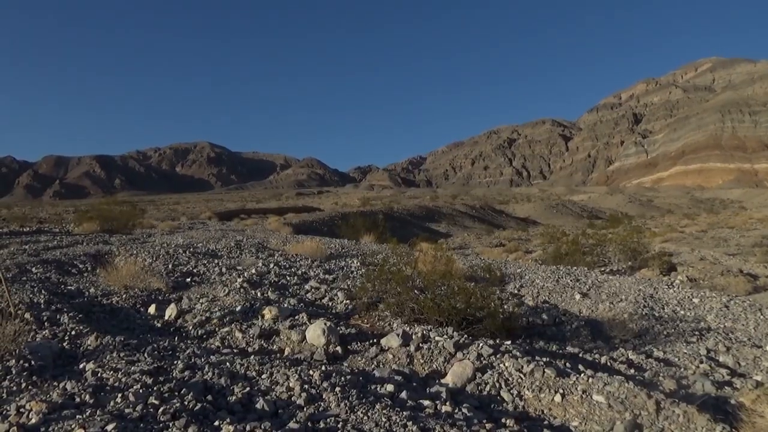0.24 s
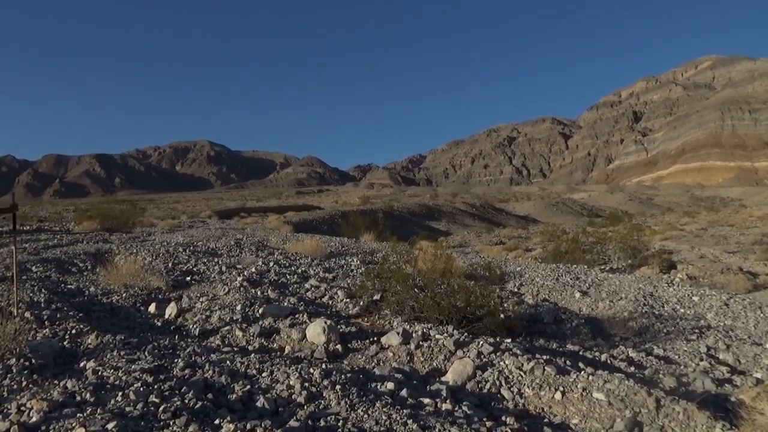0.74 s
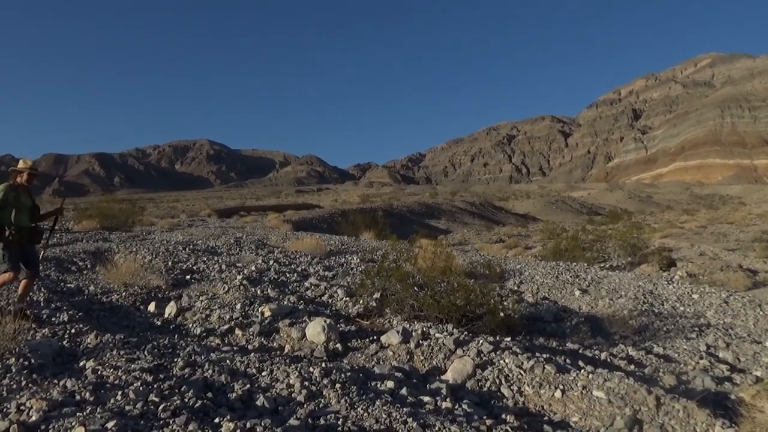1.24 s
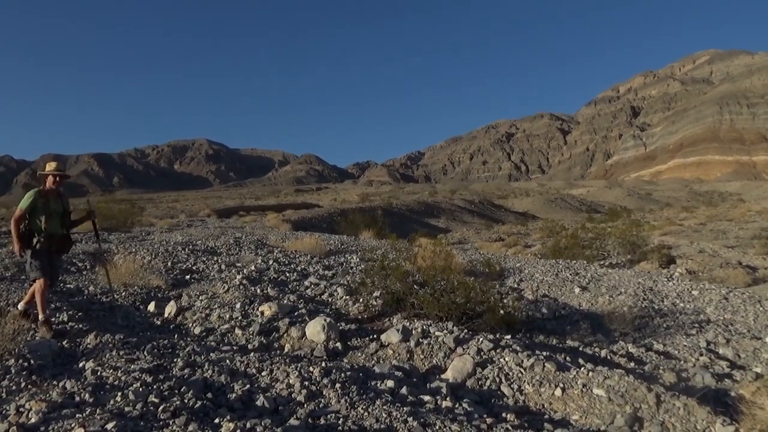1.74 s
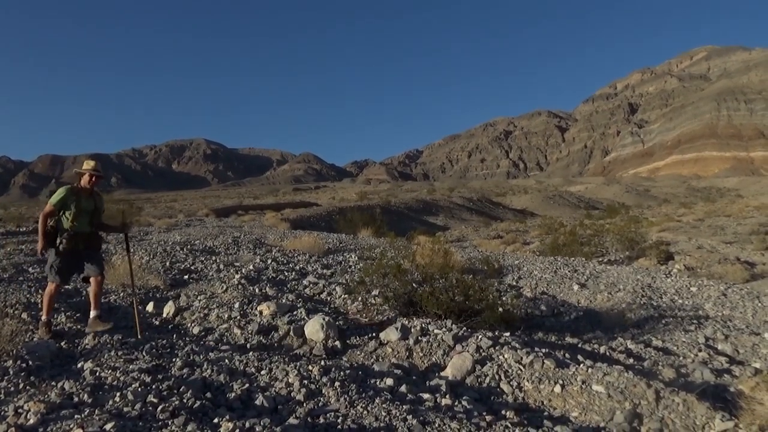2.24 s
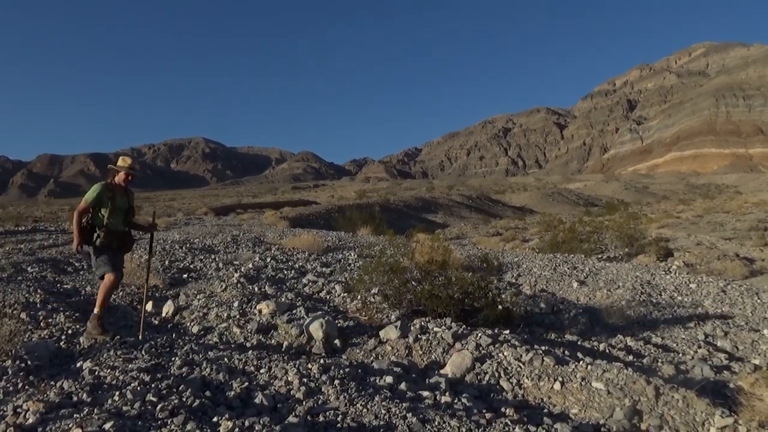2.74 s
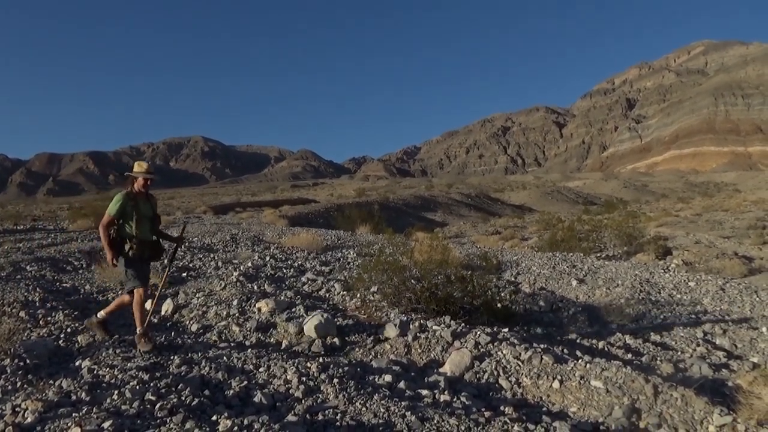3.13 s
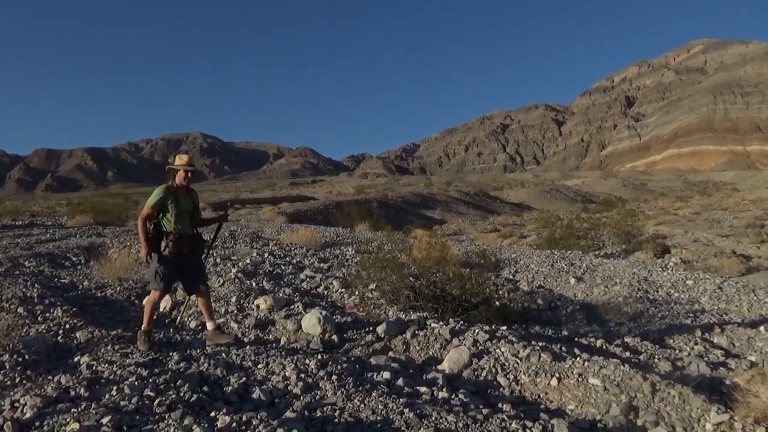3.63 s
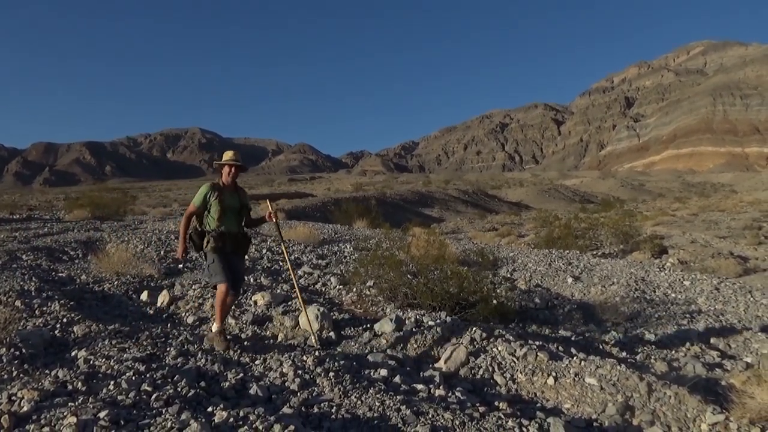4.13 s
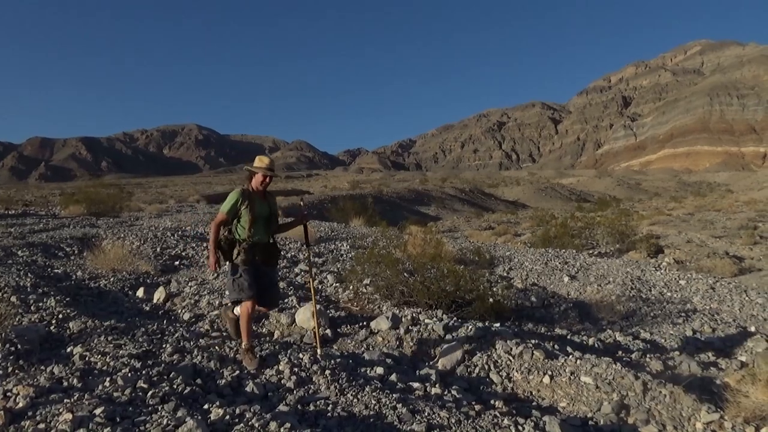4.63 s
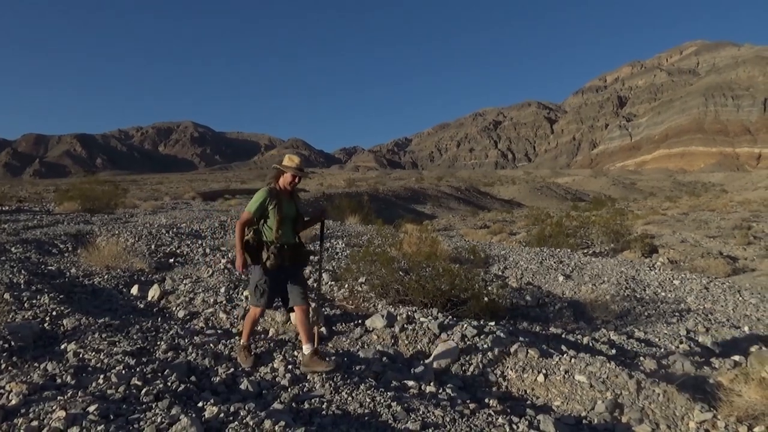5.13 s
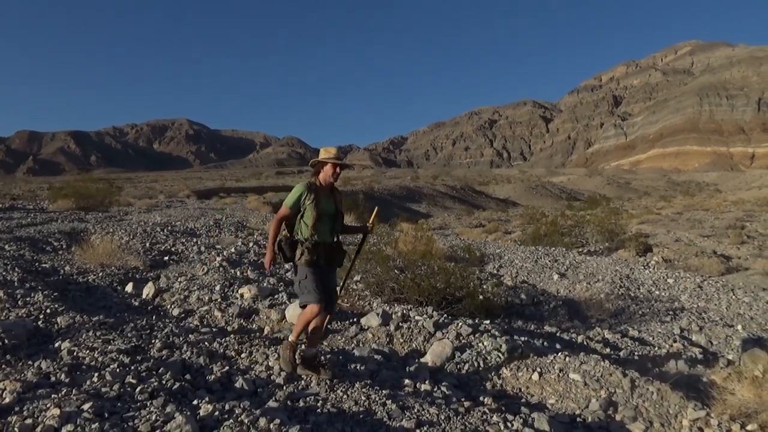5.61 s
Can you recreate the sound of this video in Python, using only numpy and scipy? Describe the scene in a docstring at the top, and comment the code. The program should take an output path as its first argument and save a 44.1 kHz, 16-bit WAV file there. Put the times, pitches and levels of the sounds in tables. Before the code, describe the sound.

One walker crosses loose gravel in a quiet, open desert wash. Each step is a crisp crunch of grit and pebbles, and single stones click, rattle and settle between steps. A wooden staff knocks lightly on the rocks a few times. The steps start a little to the left and grow louder and brighter as they near the middle, over a faint hiss of still air.

```python
"""Footsteps crunch over loose gravel in an open desert wash, moving from the left towards the middle.
Each step grinds grit, pebbles and cobbles in jerks: swarms of tiny damped clicks. Single stones knock,
rattle and settle, and the walker's wooden staff grates and rings as it lands. Nearby rocks add a short
tail. Behind it, still air hisses faintly and a puff of wind brushes a small camera's close-set mics."""
import sys
import numpy as np
from scipy import signal
from scipy.fft import rfft, irfft, next_fast_len
from scipy.io import wavfile
from scipy.ndimage import map_coordinates

SR = 44100
rng = np.random.default_rng(int(sys.argv[2]) if len(sys.argv) > 2 else 0)


def put_to_file(sound):
    """Save the sound as 16-bit audio at rate SR, in the file named by the first command-line argument."""
    columns = np.atleast_2d(sound).T  # one column per channel
    safe = np.clip(columns, -1, 1)
    whole_steps = np.round(safe * 32767)
    wavfile.write(sys.argv[1], SR, whole_steps.astype(np.int16))


N = 258787

# Tone of the air hiss: frequency_hz, gain_db
AIR_EQ = [(20, -24), (50, -20), (150, -16), (205, 0), (300, -5), (520, -3), (950, 0), (1500, -6),
          (3000, -8), (6000, -12), (11000, -16), (16600, -20)]
# How alike the hiss is left and right: frequency_hz, correlation
AIR_CORRELATION = [(60, 0.74), (130, 0.76), (290, 0.64), (640, 0.26), (1410, 0.13), (3100, 0.39),
                   (6820, 0.8), (15000, 0.99)]
# A puff of wind on the microphone ports: time_s, level_db
WIND_PUFF = [(0, -104), (4.3, -104), (4.5, -84), (4.7, -94), (4.9, -88), (5.2, -95), (5.87, -102)]
# Colour of the ground and the microphones: frequency_hz, gain_db
GROUND_EQ = [(30, -78), (100, -17.5), (250, -4.5), (520, -10.5), (900, -1), (1500, -4), (2800, 0),
             (5500, 0), (8300, 2.5), (11500, -1.5), (16500, -16.5)]
# The walker's pan: time_s, left_over_right_db
WALKER_PAN = [(0, 4.5), (2.5, 2.8), (3.7, 1.2), (4.3, .6), (5.87, .3)]
# The camera body shades the far microphone: frequency_hz, pan_factor
BODY_SHADOW = [(100, 0), (400, 0.2), (1300, 0.92), (2400, 1.45), (5000, 0.74), (15000, 1.06)]
# Resonances of the wooden shaft: pitch_hz, level_db, t60_s
STAFF_MODES = [(346, -1, 0.028), (910, -2, 0.031), (1110, 2, 0.013), (1990, -10, .01), (2500, -8, 0.0054),
               (2740, 1, 0.013), (3550, -6, 0.013), (4300, -42, 0.036)]
# The staff tip lands: start_s, level_db, tilt_db_per_octave, lowest_mode_boost_db, grate_s
STAFF_HITS = [(0.2522, -33, 4, -22, 0.0063), (1.401, -37, -3, -14, 0.0012), (2.0111, -33, -1, 10, 0.0039),
              (4.351, -44.5, -6, 5, 0.0042)]
# Knocks of stones and of the staff tip: start_s, level_db, pitch_hz, thud_offset_db, rattle_s
STONE_KNOCKS = [(0.2497, -40, 3000, -22, 0.0031), (0.2529, -24.5, 2580, -10, 0.0079),
                (0.4847, -34, 8500, -23, 0.0053), (0.5872, -35, 4020, -22, 0.012),
                (0.609, -36.5, 7000, -18, 0.0074), (0.791, -50, 2880, -30, 0.0041),
                (0.8042, -46.5, 5760, -21, 0.0032), (1.0318, -49, 3860, -27, 0.0024),
                (1.0814, -32, 6200, -21, 0.0073), (1.1145, -26.5, 9700, -27, 0.0055),
                (1.162, -30.5, 2570, 6.5, 0.0069), (1.2068, -27, 3680, -26, 0.0092),
                (1.2134, -32.5, 2050, 0.6, 0.004), (1.253, -38.5, 4260, -27, 0.0062),
                (1.269, -33.5, 8000, -36, 0.0066), (1.294, -45, 3580, -27, 0.0016),
                (1.4025, -24, 5030, -6, 0.0031), (1.449, -44, 2900, -5, 0.0036),
                (1.4641, -41.5, 3000, -24, 0.0035), (1.5114, -26.5, 8000, -16, 0.0087),
                (1.538, -37, 7460, -33, 0.0061), (1.5598, -44, 2130, -22, 0.0032),
                (1.624, -40.5, 7500, -8, 0.0025), (1.72, -32, 7260, -15, 0.0076),
                (1.867, -34, 3220, -24, 0.0044), (2.0125, -24, 3490, -9, 0.0084),
                (2.131, -46, 4030, -1.5, 0.0068), (2.2323, -40, 5400, -10, 0.0081),
                (2.3503, -44, 3550, -8, 0.006), (2.404, -20.5, 6940, -8.5, 0.018),
                (2.462, -20.5, 8350, -15, 0.015), (2.5766, -21.5, 4430, -25, 0.01),
                (2.609, -32, 4650, -35, 0.0047), (2.686, -40, 8550, -30, 0.003),
                (2.7085, -42, 1800, 0, 0.0047), (2.7183, -42, 2930, -30, 0.0024),
                (2.7386, -68, 7200, -27, 0.0065), (2.764, -55, 6920, -30, 0.0033),
                (2.811, -56, 6960, -28, 0.0022), (2.922, -50, 2950, -24, 0.0047),
                (2.9483, -51, 3180, -19, 0.0036), (3.01, -54, 7000, -29, 0.0031),
                (3.062, -49, 4500, -25, 0.003), (3.1099, -50, 7600, -1, 0.0045),
                (3.1802, -16.5, 4500, -32, 0.0099), (3.353, -30, 8000, -36, 0.0061),
                (3.411, -36, 8500, -32, 0.0031), (3.5, -48, 2500, -22, 0.0068),
                (3.57, -40, 6900, -1.5, 0.0053), (3.6306, -44.5, 4460, -19, 0.0056),
                (3.728, -42.5, 8500, -9, 0.0029), (3.861, -37.5, 2060, -25, 0.003),
                (3.9162, -32.5, 5500, -30, 0.0057), (4.007, -44, 1930, 1.5, 0.0096),
                (4.105, -50, 6200, -20, 0.0049), (4.17, -49.5, 7450, -21, 0.0026),
                (4.3527, -24, 2160, 1.5, 0.018), (4.3579, -18.5, 10100, -14, 0.01),
                (4.39, -17.5, 9100, -39, 0.016), (4.4458, -23, 9900, -34, 0.023),
                (4.4493, -26, 2140, -13, 0.016), (4.497, -38, 3430, -27, 0.0018),
                (4.5565, -15.5, 8950, -13, 0.0089), (4.6605, -25, 10030, -24, 0.0059),
                (4.6704, -13.5, 9200, -36, 0.0092), (4.7177, -9, 10150, -35, 0.013),
                (4.76, -34, 5380, -46, 0.0038), (4.784, -27.5, 9000, -38, 0.0015),
                (4.806, -31, 7800, -36, 0.0017), (4.827, -31.5, 9900, -30, 0.0098),
                (4.8611, -30, 9200, -44, 0.0036), (4.8783, -26.5, 8300, -36, 0.0082),
                (4.913, -47, 4950, -34, 0.0022), (4.9245, -22, 8360, -45, 0.0022),
                (4.9315, -23.5, 7160, -43, 0.0036), (4.897, -48, 4000, -29, 0.0023),
                (4.9466, -33, 9600, -29, 0.0024), (5.0196, -45.5, 5000, -29, 0.0035),
                (5.0581, -34.5, 4500, -38, 0.0045), (5.077, -19, 9100, -51, 0.0034),
                (5.1167, -18.5, 10600, -48, 0.0059), (5.158, -21.5, 5500, -53, 0.0039),
                (5.2205, -22, 10600, -17, 0.006), (5.2375, -22, 7600, -37, 0.0055),
                (5.269, -24, 5800, -11, 0.015), (5.2966, -25, 6800, -28, 0.017),
                (5.3405, -11, 8650, -22, 0.0012), (5.4499, -25, 8550, -31, 0.0043),
                (5.462, -22, 7550, -10.5, 0.0055), (5.548, -33, 8000, -32, 0.0029),
                (5.5885, -41.5, 3700, -5, 0.0032), (5.7397, -35.5, 3250, -7, 0.009),
                (5.81, -41.5, 4950, 2, 0.0092), (5.8622, -33.5, 3360, -0.5, 0.019)]
# The gravel crunches under a foot or the staff tip, or settles afterwards:
# start_s, rise_s, fall_s, grit_db, pebbles_over_grit_db, cobbles_over_grit_db
GRAVEL_CRUNCHES = [(0.264, 0.017, 0.074, -79.5, 11, 7), (0.351, .045, 0.13, -58.5, 2, 2),
                   (0.429, 0.038, 0.076, -59.5, -2.2, 1), (0.532, 0.049, 0.052, -67, 4, 11.5),
                   (0.705, 0.019, 0.017, -84.5, 5, 23), (1.032, 0.047, 0.092, -57, 4.5, 6.5),
                   (1.155, 0.061, 0.04, -56, 3.5, 9), (1.254, 0.013, 0.013, -64, 5, -21),
                   (1.51, 0.015, 0.058, -61, -3, -0.5), (1.719, 0.02, 0.067, -67.5, 8.5, 14.5),
                   (1.79, 0.045, 0.04, -51, 4, 5), (1.879, 0.041, 0.044, -59.5, 9, 9.5),
                   (2.002, 0.0057, 0.027, -54.5, 11.5, 14), (2.392, 0.018, 0.098, -51.5, 1, -8),
                   (2.439, 0.063, 0.11, -45.5, 0.1, -1.5), (2.544, 0.028, 0.1, -60.5, 7, -4),
                   (2.891, 0.029, 0.021, -83.5, 11, 20.5), (3.135, 0.05, 0.054, -48.5, 4.5, 2),
                   (3.237, 0.073, 0.11, -46, -1, -2.5), (3.725, 0.024, 0.12, -70, -1, 7.5),
                   (3.819, 0.072, 0.097, -62, 4.5, 6.5), (4.352, 0.05, 0.034, -51.5, 0.5, -10),
                   (4.44, 0.014, 0.054, -56.5, 1, 5.5), (4.49, 0.036, 0.033, -68, 9, 14.5),
                   (4.549, 0.014, 0.033, -45.5, 0.3, -1.5), (4.6, 0.015, 0.024, -51, 0, -8),
                   (4.664, 0.032, 0.055, -38, -11, -28), (4.739, 0.035, 0.042, -47.5, -16, -52),
                   (4.86, 0.036, 0.018, -82, -24, -33), (5.212, 0.052, 0.069, -45.5, -1, -8.5),
                   (5.28, 0.13, 0.04, -37, -6, -9), (5.44, 0.017, 0.1, -48.5, -5, -15),
                   (5.72, 0.026, 0.022, -62, 1, -6), (5.791, 0.062, .05, -64.5, -11, -3.5)]


def amp(db):
    return 10 ** (np.asarray(db) / 20)


def unit_rms(x):
    return x / np.sqrt(np.mean(x ** 2) + 1e-20)


def at_hz(table, hz):
    """Read a frequency table along a log axis."""
    frequencies, values = np.transpose(table)
    return np.interp(np.log(hz + 1), np.log(frequencies + 1), values)


def envelopes(rows):
    """One value per sample for each column after the time."""
    time_s, *columns = np.transpose(rows)
    return [np.interp(np.arange(N) / SR, time_s, column) for column in columns]


def wobble(rate_hz):
    """A smooth random drift."""
    knots = rng.standard_normal(int(N * rate_hz / SR) + 4)
    return map_coordinates(knots, [np.arange(N) * rate_hz / SR])


def eq(x, response):
    """Shape x with a gain given as a function of frequency."""
    size = next_fast_len(N + 8192)
    return irfft(rfft(x, size) * response(np.fft.rfftfreq(size, 1 / SR)), size)[..., :N]


def air(hiss_db=-72.5):
    """A steady hiss, widest in the mids, and a little low wind rumble on the microphones."""
    def mid_side_gain(hz):
        width = np.arccos(np.clip(at_hz(AIR_CORRELATION, hz), -1, 1)) / 2
        return amp(at_hz(AIR_EQ, hz)) * [np.cos(width), np.sin(width)]

    mid, side = eq(rng.standard_normal((2, N)), mid_side_gain)
    hiss = amp(hiss_db + 0.26 * wobble(4.8)) * unit_rms(np.array([mid + side, mid - side]))
    near_mono = rng.standard_normal(N) + 0.21 * rng.standard_normal((2, N))
    rumble = eq(near_mono, lambda hz: (hz / 45) / (1 + (hz / 80) ** 5))
    return hiss + amp(envelopes(WIND_PUFF)[0] + 1.3 * wobble(14)) * unit_rms(rumble)


def rock_reflections(gravel, t60_s=0.053):
    """Nearby rocks return a short, diffuse tail, a separate one for each side."""
    t = np.arange(SR // 8) / SR
    tail = rng.standard_normal((2, len(t))) * amp(-60 * t / t60_s)
    echo = signal.fftconvolve(gravel[None], tail / np.linalg.norm(tail[0]), axes=1)[:, :N]
    return eq(echo, lambda hz: hz ** 2 / (hz ** 2 + 700 ** 2) / (1 + hz / 4000))


def staff():
    """The tip grates on stone for a moment and sets the wooden shaft ringing in its own modes."""
    track, t = np.zeros(N + SR), np.arange(SR // 10) / SR
    hz, mode_db, t60_s = np.transpose(STAFF_MODES)[:, :, None]
    attack = (1 - np.exp(-hz * t)) ** 2
    for start_s, level_db, tilt_db, boost_db, grate_s in STAFF_HITS:
        struck_db = mode_db + tilt_db * np.log2(hz / 1000) + boost_db * (hz == hz.min())
        ring = np.sum(amp(struck_db - 60 * t / t60_s) * attack * np.sin(2 * np.pi * hz * t), axis=0)
        grate = rng.standard_normal(len(t)) * np.exp(-t / grate_s)
        hit = signal.fftconvolve(ring, grate / np.linalg.norm(grate))[:len(t)]
        track[round(start_s * SR):][:len(t)] += amp(level_db) * hit
    return track[:N]


def clicks(start_s, hz, gain, ring_cycles, samples):
    """Stone on stone: each contact is a sine that rises in a cycle and falls by e in ring_cycles."""
    k = np.arange(samples)
    cycles = np.clip(hz, 60, 17000)[:, None] * k / SR
    envelope = (1 - np.exp(-cycles)) * np.exp(-cycles / ring_cycles) * np.cos(np.pi / 2 * k / samples)
    grains = gain[:, None] * envelope * np.sin(2 * np.pi * cycles)
    where = np.round(start_s * SR).astype(int)[:, None] + k
    return np.bincount(where.ravel(), grains.ravel(), N + SR)[:N]


def rattle(start_s, db, length_s, hz, spread, ring_cycles, count, samples):
    """A run of contacts, thickest at the blow, fading as the stone comes to rest; long runs swell first."""
    jitter = rng.standard_normal((len(start_s), 2, count))
    delay = 3 * rng.random((len(start_s), count)) ** 2  # in units of run_s
    run_s = np.clip(length_s - .0015, .0005, .04)[:, None]
    swell = np.clip(run_s / .03, 0, .3)
    fade_db = 10 * np.abs(delay - swell) + 20 * np.maximum(swell - delay, 0)
    gain = amp(db[:, None] + 2 * jitter[:, 0] - fade_db)
    pitch_hz = hz[:, None] * np.exp(spread * jitter[:, 1])
    contact_s = start_s[:, None] + run_s * (delay - swell / 2)
    return clicks(contact_s.ravel(), pitch_hz.ravel(), gain.ravel(), ring_cycles, samples)


def knocks(rows):
    """A stone rings briefly at its own pitch, chips at the contact and thuds into the ground."""
    start_s, db, hz, thud_db, rattle_s = np.transpose(rows)
    chip_db = db - 6 - 4.5 * np.log2(hz / 4000)  # small stones chip more softly
    chip_hz = 5010 * (hz / 5010) ** 0.34  # loosely tracks the stone's pitch
    ring = rattle(start_s, db - 6.5, rattle_s, hz, spread=.2, ring_cycles=2.6, count=22, samples=160)
    chips = rattle(start_s, chip_db, rattle_s, chip_hz,
                   spread=.48, ring_cycles=1.52, count=28, samples=96)
    thud = rattle(start_s, db + thud_db - 5, 1.4 * rattle_s, hz=np.full_like(hz, 620),
                  spread=.4, ring_cycles=1.3, count=20, samples=400)
    return ring + chips + thud


def stray_stones(grit_db, pebble_db, cobble_db, count=110, rattle_s=0.0054):
    """Loose stones knock at random moments, as hard and as coarse as the gravel moving around them."""
    moment, force = rng.random((count, 2)).T
    start_s = moment * (N - 1) / SR
    at = (start_s * SR).astype(int)
    level_db = grit_db[at] + 8.5 - 4 * np.log(1 - .95 * force)
    octaves_up = 0.0385 * (grit_db - pebble_db)[at]  # smaller stones where pebbles are few
    pitch_hz = 5400 * np.exp(0.413 * rng.standard_normal(count)) * 2 ** octaves_up
    thud_db = (cobble_db - grit_db)[at] - 39
    return knocks(np.transpose([start_s, level_db, pitch_hz, thud_db, np.full(count, rattle_s)]))


def gravel_load(bite_db=-13.5, lift_db=-19, edge_db_per_s=1512, settle_db_per_s=26):
    """Grit, pebble and cobble envelopes in dB: each crunch bites, swells, sinks, lifts off and settles."""
    t = np.arange(0, N / SR + .002, .001)
    levels = np.full((3, len(t)), 1e-6)
    for start_s, rise_s, fall_s, grit_db, pebble_db, cobble_db in GRAVEL_CRUNCHES:
        peak_s = start_s + rise_s
        end_s = peak_s + fall_s
        shape_db = np.interp(t, [start_s - 1, start_s, peak_s, end_s, end_s + 1],
                             [bite_db - edge_db_per_s, bite_db, 0, lift_db, lift_db - edge_db_per_s])
        levels += amp([[grit_db], [grit_db + pebble_db], [grit_db + cobble_db]]) * amp(shape_db)
        trickle_db = -81 + 0.31 * (grit_db + 50)  # stones trickle on, louder after a hard crunch
        levels += (t > peak_s) * amp(trickle_db - settle_db_per_s * np.abs(t - end_s))
    return envelopes(np.transpose([t, *(20 * np.log10(levels))]))


def jerks(rate_hz, decay_s):
    """The gravel slips at random moments: a control curve of sudden jumps and quick falls."""
    slips = (rng.random(N) < rate_hz / SR) * rng.exponential(1, N)
    jolts = np.sqrt(signal.lfilter([1], [1, -np.exp(-1 / (decay_s * SR))], slips))
    return unit_rms(jolts - np.mean(jolts))


def grind(moving_share, count, hz, spread, ring_cycles, accent_db, samples):
    """Stones of one size grind at random moments, a few much harder than the rest."""
    start_s = rng.uniform(0, N / SR, count)
    pitch_hz = hz * np.exp(spread * rng.standard_normal(count))
    force = amp(accent_db * np.minimum(rng.exponential(1, count), 5)) * np.sqrt(pitch_hz / hz)
    share = moving_share[(start_s * SR).astype(int)]
    moves = rng.random(count) < share
    gain = force / np.sqrt(share)  # sparse stretches keep the same power
    return unit_rms(clicks(start_s[moves], pitch_hz[moves], gain[moves], ring_cycles, samples))


def gravel_crunch(grit_db, pebble_db, cobble_db):
    """The gravel packs in jerks shared by all stone sizes; under light load only a few stones tick."""
    moving = np.clip(amp(.8 * (grit_db + 65)), .07, 1)
    jerk_db = 1.6 * wobble(60) + 2.8 * jerks(rate_hz=130, decay_s=.004)
    grit = grind(moving, count=30000, hz=8200, spread=.33, ring_cycles=2.8, accent_db=3, samples=64)
    pebbles = grind(moving, count=18000, hz=2800, spread=.42, ring_cycles=1.5, accent_db=2.6, samples=128)
    cobbles = grind(np.sqrt(moving), count=6000, hz=537,
                    spread=.55, ring_cycles=.65, accent_db=2, samples=512)
    crisp = amp(jerk_db) * (amp(grit_db) * grit + amp(pebble_db) * pebbles)
    body = amp(cobble_db + 0.49 * jerk_db) * cobbles
    return crisp + body


def scene():
    """Steps, stones and staff lean to the walker's side, over the rock reflections and the air."""
    load_db = gravel_load()
    walk = gravel_crunch(*load_db) + knocks(STONE_KNOCKS) + stray_stones(*load_db) + staff()
    gravel = eq(walk, lambda hz: amp(at_hz(GROUND_EQ, hz)))
    pan = np.tanh(envelopes(WALKER_PAN)[0] * np.log(10) / 40)  # dB to side-over-mid ratio
    side = pan * eq(gravel, lambda hz: at_hz(BODY_SHADOW, hz))
    return np.array([gravel + side, gravel - side]) + amp(-9.5) * rock_reflections(gravel) + air()


def record(dry, cutoff_hz=16620):
    """The camera's band limit: a steep high cut with a faint, narrow shelf just above it."""
    return eq(dry, lambda hz: np.where(hz < cutoff_hz, 1, .02 * (hz < 1.047 * cutoff_hz)))


dry = scene()
out = record(dry)
put_to_file(out)
```